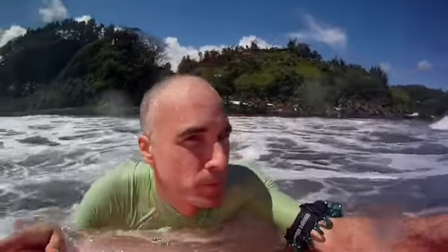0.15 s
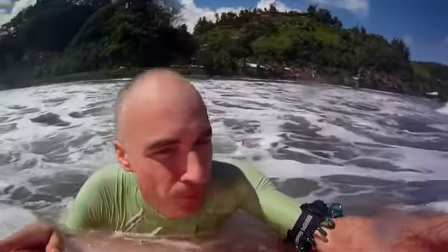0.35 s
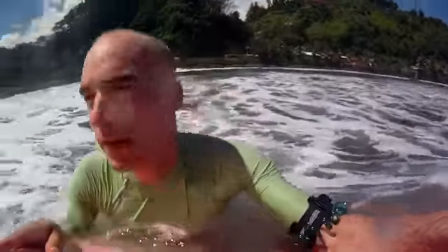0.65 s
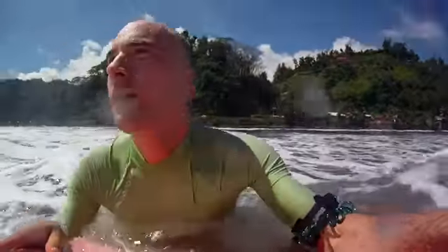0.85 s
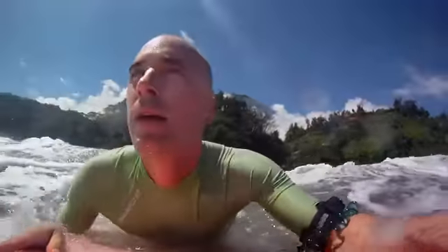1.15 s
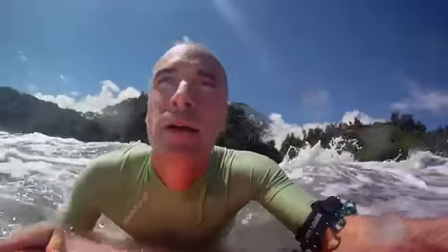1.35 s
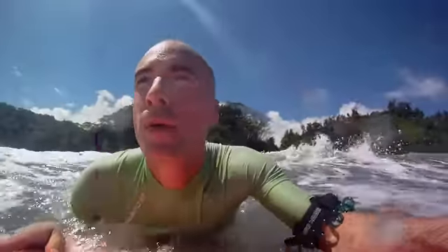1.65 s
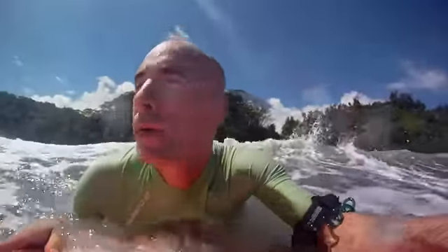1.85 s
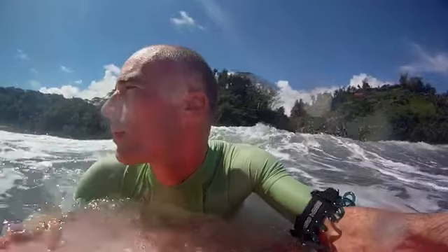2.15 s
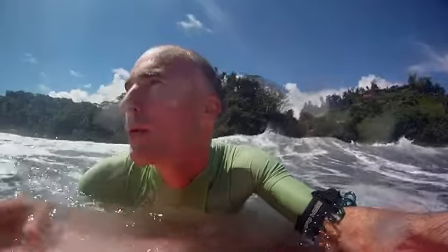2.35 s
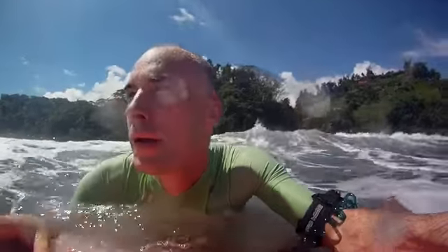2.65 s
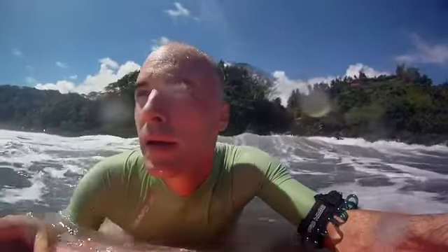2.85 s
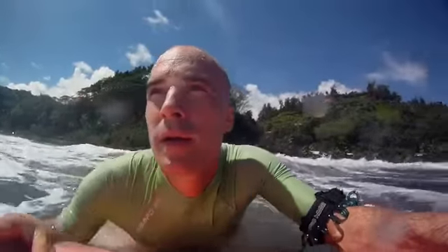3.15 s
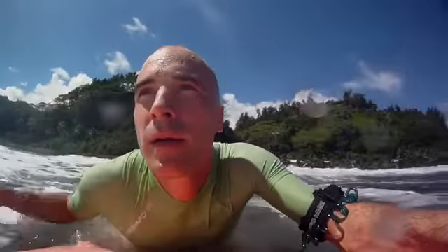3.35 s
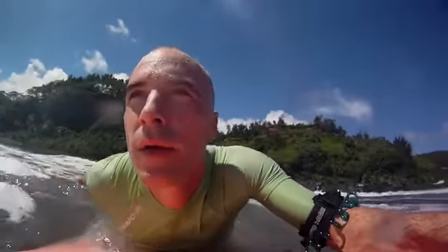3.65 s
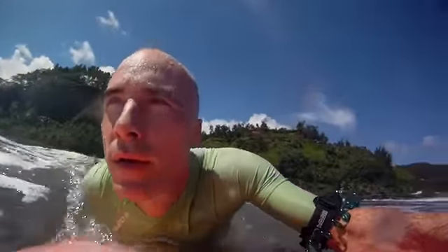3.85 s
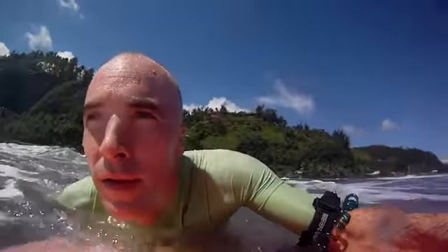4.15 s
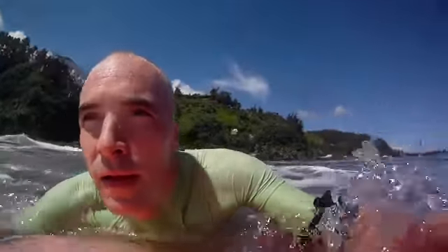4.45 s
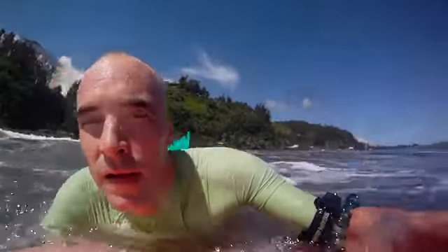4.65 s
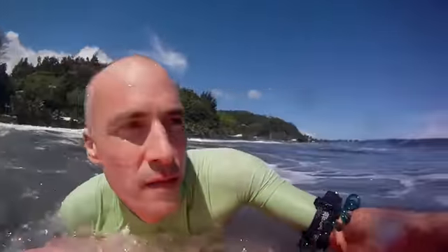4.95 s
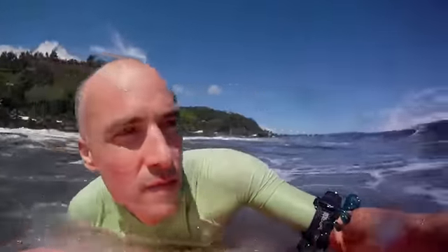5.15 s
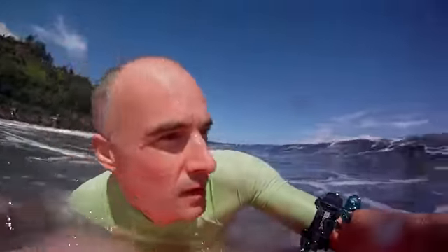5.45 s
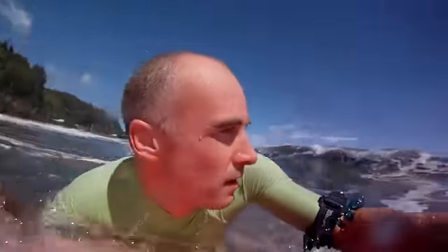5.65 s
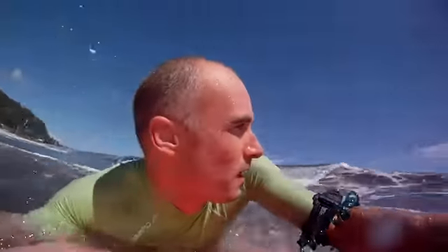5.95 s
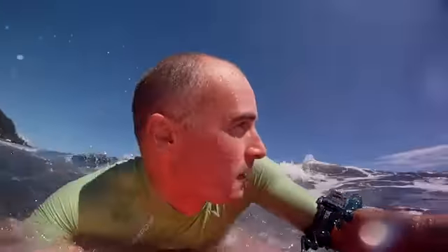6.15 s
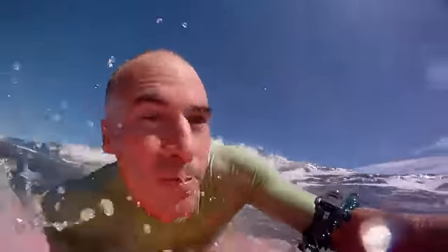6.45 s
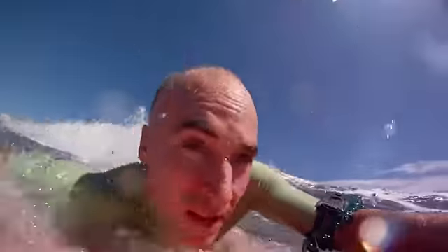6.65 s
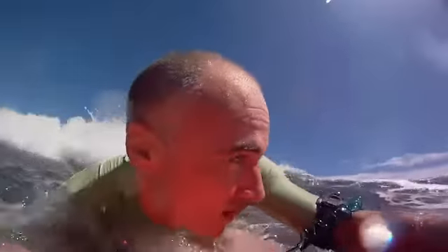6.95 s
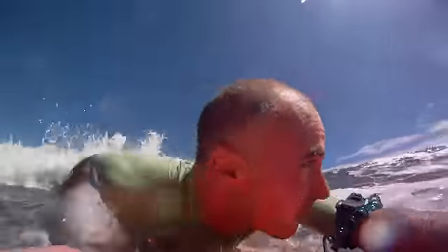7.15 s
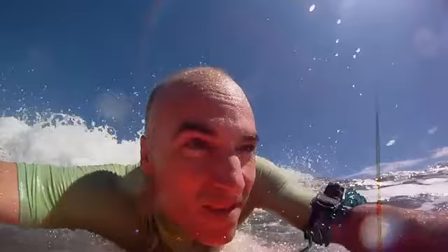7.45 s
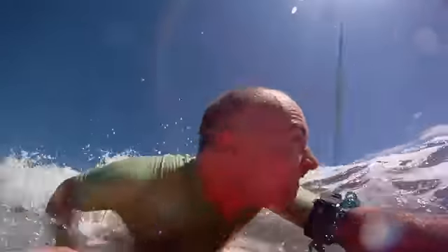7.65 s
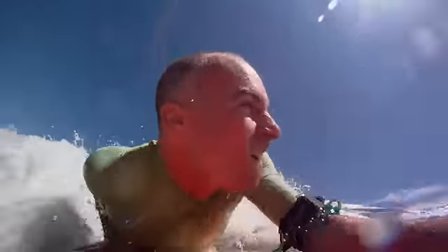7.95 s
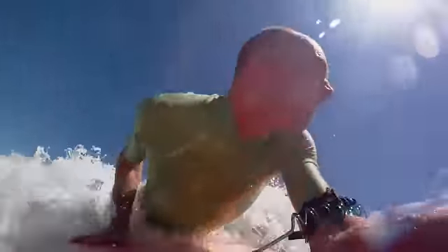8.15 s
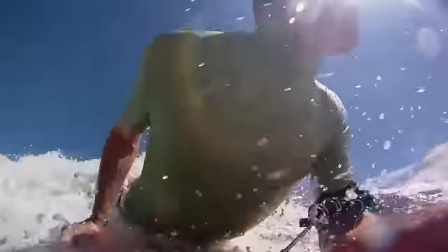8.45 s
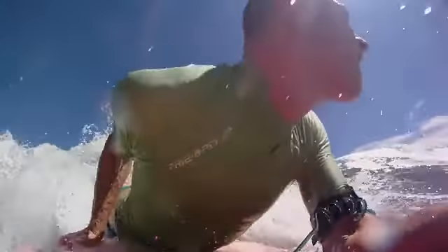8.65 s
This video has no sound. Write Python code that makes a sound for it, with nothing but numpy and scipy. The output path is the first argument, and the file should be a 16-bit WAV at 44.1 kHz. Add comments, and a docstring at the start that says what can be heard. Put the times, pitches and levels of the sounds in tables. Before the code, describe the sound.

Heard through a waterproof camera case on a surfboard, the sea begins as a faint, muffled wash broken by a cluster of sharp drop ticks. The sloshing grows, and surges gurgle, slap and rumble against the board under a thin hiss of foam. Late on, spray hits the case in two bright, pattering bursts, the loudest sounds, followed by a smaller spatter and more sloshing.

```python
"""Whitewater hisses, sloshes and gurgles round a surfboard, heard from a camera in a sealed housing on it.
Waves drive the board's lowest mode into a boom, water slaps the board, and squeezed air pockets sing.
Spray drops tick on the housing, whose air resonances colour both their impacts and the hiss of the foam.
One microphone feeds both channels; loud drops saturate it, and the right channel loses its deep bass."""
import sys
import numpy as np
from scipy import signal
from scipy.fft import rfft, irfft, next_fast_len
from scipy.io import wavfile
from scipy.ndimage import uniform_filter1d, map_coordinates

SR = 44100
rng = np.random.default_rng(int(sys.argv[2]) if len(sys.argv) > 2 else 0)


def to_wav(sig):
    """Store sig (one row per channel, or 1-D mono) as 16-bit WAV at the path in sys.argv[1].

    Samples outside -1..1 are clipped; the rate is SR.
    """
    pcm = np.clip(np.atleast_2d(sig), -1, 1) * 32767
    pcm = np.round(pcm).astype(np.int16)
    wavfile.write(sys.argv[1], SR, pcm.T)  # frames by channels


N = 387638

# Envelope of the foam. Each row: time in seconds, hiss level in dB.
FOAM_LEVELS = [(0, -61.5), (.3, -65.5), (.76, -58.5), (.82, -51.5), (.93, -49), (1.05, -53.5), (1.33, -54),
               (1.55, -45.5), (2.1, -49.5), (2.8, -43.5), (3.05, -48), (3.35, -41), (3.7, -45.5),
               (5.0, -45.5), (5.3, -42.5), (6.65, -47), (6.95, -30.5), (7.2, -44.5), (7.48, -37.5),
               (7.7, -44.5), (8.79, -45.5)]
# Envelope of the water working at the board. Each row: time in seconds, slosh level in dB.
SLOSH_LEVELS = [(0, -56.5), (.4, -66), (.5, -56), (1.07, -62), (1.49, -52.5), (2.3, -50.5), (2.67, -43),
                (3.05, -44.5), (3.4, -39), (3.75, -44.5), (4.36, -56), (4.5, -46.5), (5.0, -52),
                (5.33, -46), (6.07, -40.5), (6.28, -48.5), (6.45, -41.5), (6.63, -57), (6.93, -42),
                (7.17, -48), (7.42, -43), (8.0, -43), (8.79, -43.5)]
# Waves hitting the board. Each row: peak time in seconds, slosh, boom and heave in dB, fade in seconds.
WAVE_SURGES = [(0.61, -50, -61, -58, 0.12), (0.93, -50, -73, -66, 0.18), (1.43, -51, -41.5, -38.5, 0.092),
               (2.04, -47.5, -43.5, -47, 0.18), (2.8, -40, -37.5, -37, 0.18),
               (3.56, -28.5, -32, -30.5, 0.086), (3.9, -44, -33, -47, 0.11),
               (4.21, -41.5, -36.5, -35, 0.15), (4.65, -49, -41, -50, 0.15), (4.8, -41, -39, -48, 0.095),
               (5.208, -32, -33, -25.5, 0.066), (5.48, -39.5, -43.5, -40, 0.3),
               (6.42, -38.5, -31.5, -50, 0.076), (6.78, -38.5, -43, -43, 0.15),
               (7.55, -39.5, -53, -42, 0.16), (7.88, -40, -37, -36, 0.067), (8.41, -47, -35, -36, .12)]
# Big drops on the housing. Each row: start in seconds, level in dB, ring pitch in Hz, brightness in dB.
BIG_DROPS = [(1.023, -37, 4570, -30), (1.213, -31.5, 4250, -28), (1.277, -36.5, 4180, -35),
             (1.335, -37, 4200, -30), (1.484, -10.5, 2970, -22.5), (1.5007, -19, 3760, -33),
             (1.524, -20, 2480, -31), (1.529, -13, 3950, -30), (1.5335, -16, 4260, -35),
             (1.5367, 0, 2760, -39), (1.5556, -27, 3460, -9), (1.586, -12.5, 3030, -37),
             (1.6223, -22, 4640, -40), (2.845, -20, 4070, -29), (2.908, -23, 4550, -37),
             (3.5477, -18.5, 3130, -17.5), (3.901, -21.5, 3370, -28), (5.1889, -13, 3390, -16),
             (5.535, -25, 3300, -23), (5.655, -29, 3290, -10.5), (5.874, -8, 5330, -19),
             (5.892, -14, 5080, -26), (6.8057, -11, 4880, -16), (6.8563, -18.5, 2420, -36),
             (6.9367, -6.5, 3780, -14), (6.9551, -4, 4830, -20), (6.9604, -4.5, 3216, -21),
             (6.9768, -1.5, 3178, -27), (6.993, -5.5, 3650, -32), (7.0121, -2, 3650, -38),
             (7.0277, -14, 3790, -26), (7.0633, -15, 3720, -30), (7.11, -17, 3400, -20),
             (7.137, -11.5, 2830, -25), (7.201, -24.5, 3800, -12.5), (7.2478, -13.5, 3340, -24),
             (7.331, -20, 4000, -22), (7.3484, -12, 3240, -36), (7.3596, -10, 2490, -37),
             (7.387, -17, 4550, -28), (7.3958, -15.5, 2780, -20), (7.424, -11, 3666, -33),
             (7.471, -27, 3040, -8), (7.5173, -15, 3260, -15), (7.5305, -4, 4740, -21),
             (7.5359, -1, 3085, -34), (7.556, -6, 4810, -23), (7.842, -25, 2950, -28),
             (8.008, -12, 3260, -17), (8.0848, -26, 3340, -29), (8.217, -28, 3340, -8),
             (8.546, -24, 4770, -26)]
# Showers of spray. Each row: peak time in seconds, level in dB, build and fade in seconds,
# brightness in dB.
SPRAY_SHOWERS = [(6.8, -38, .1, 0.26, -15.5), (6.956, -16.5, 0.031, 0.14, -16),
                 (7.4, -35, 0.23, 0.21, -14.5), (7.55, -31, 0.21, 0.14, -19),
                 (8.01, -24, .003, 0.041, -8.5), (8.05, -40.5, .02, .33, -12)]
# Water striking the board. Each row: start in seconds, level in dB, pitch in Hz, 60 dB decay in seconds.
WATER_SLAPS = [(0.456, -42, 945, 0.082), (0.909, -33.5, 870, 0.047), (1.109, -40, 918, 0.12),
               (1.374, -35, 1258, 0.18), (1.436, -36.5, 954, 0.14), (1.53, -33, 1350, 0.1),
               (1.567, -31.5, 1780, 0.21), (1.725, -29.5, 1435, 0.037), (2.025, -30.5, 416, 0.061),
               (2.844, -25, 1085, 0.13), (3.308, -19.5, 852, 0.061), (4.649, -30, 1095, 0.11),
               (4.812, -23, 1570, 0.033), (5.113, -27.5, 980, 0.048), (5.174, -18, 299, 0.079),
               (5.41, -15.5, 1560, 0.04), (5.488, -16, 1355, 0.047), (5.851, -27.5, 504, 0.21),
               (6.354, -29, 1536, 0.13), (6.774, -27.5, 1794, 0.089), (6.991, -21.5, 1740, 0.046),
               (7.103, -23, 1194, 0.041), (7.33, -23.5, 1300, 0.036), (7.427, -25.5, 1250, 0.13),
               (7.548, -23, 1870, 0.025), (8.36, -31, 1238, 0.15)]
# Squeezed air pockets. Each row: start in seconds, level in dB, first and last pitch in Hz,
# length in seconds, roughness from 0 to 1.
AIR_POCKETS = [(2.516, -33.5, 642, 584, 0.039, 0.56), (2.874, -27.5, 940, 890, 0.056, 0.82),
               (3.172, -24.5, 1205, 1045, 0.039, 0.3), (3.184, -19.5, 953, 860, 0.052, 0.27),
               (3.354, -21.5, 852, 888, 0.033, 0.72), (3.436, -19.5, 510, 509, 0.027, 0.72),
               (3.488, -25, 880, 907, 0.038, 0.62), (3.523, -16.5, 776, 654, 0.034, 0.78)]
# Transmission through the board. Each row: frequency in Hz, gain in dB.
BOARD_RESPONSE = [(110, -11.5), (180, -11), (225, -9), (503, -7.5), (769, -9.5), (1110, -6.5), (1330, -10),
                  (1540, -6), (2600, -20), (3380, -70), (5720, -120)]
# Transmission of airborne sound into the housing. Each row: frequency in Hz, gain in dB.
HOUSING_RESPONSE = [(1180, 2.5), (2000, -3.5), (2680, -7), (3230, 3), (4000, -2), (4790, 1.5), (5000, 1),
                    (5590, -12), (6300, -21), (6990, -18), (8150, -24), (9350, -14.5), (10300, -27.5),
                    (12200, -19.5), (15500, -37)]
# Air modes of the housing. Each row: frequency in Hz, bandwidth in Hz, added gain in dB.
HOUSING_MODES = [(3190, 250, 4.5), (3790, 110, 3.5), (4780, 320, 3), (7160, 350, 7)]
# Spectrum of the slow heave. Each row: frequency in Hz, relative spectral density in dB.
HEAVE_SPECTRUM = [(8, -46), (18, 5), (32, 10.5), (70, -8.5), (120, -45.5)]

BOOM_HZ, BOOM_WIDTH_HZ, BOOM_FLUTTER_DB = 145.7, 61, 2  # the board's lowest mode
SLOSH_REFERENCE_DB = -47
BOOM_OFFSET_DB, HEAVE_OFFSET_DB = -1.5, -3.5  # relative to the slosh at its reference level
BOOM_SLOPE, HEAVE_SLOPE = 1.46, 1.03  # dB per dB of slosh
SURGE_BUILD_RATIO = 1.44  # build time over fade time
DROP_RISE_S, DROP_T60_S = 0.0011, 0.013
CEILING, TOP_HZ = 0.76, 15400
RIGHT_BASS_HZ, RIGHT_LAG_S = 110, 1.2e-6


def whitewater():
    """Superposition of foam, slosh, boom and heave; shared modulation makes foam and slosh move as one."""
    foam_gain = amp(envelope(FOAM_LEVELS))
    slosh_gain, boom_gain, heave_gain = wave_gains()
    fizz = grains(np.ones(N), count=6000, hz=4580, octaves=0.73, cycles=2.3, scatter_db=-0.5, size=64)
    churn = wobble(22)
    return (foam_gain * foam(fizz, churn) + slosh_gain * slosh(churn)
            + boom_gain * board_boom() + heave_gain * heave())


def wave_gains():
    """Incoherent sources add in power: surges ride on the running levels of slosh, boom and heave."""
    slosh_db = envelope(SLOSH_LEVELS)
    excess_db = slosh_db - SLOSH_REFERENCE_DB
    boom_db = SLOSH_REFERENCE_DB + BOOM_OFFSET_DB + BOOM_SLOPE * excess_db
    heave_db = SLOSH_REFERENCE_DB + HEAVE_OFFSET_DB + HEAVE_SLOPE * excess_db
    power = amp([slosh_db, boom_db, heave_db]) ** 2
    for s, *peaks_db, fade in WAVE_SURGES:
        power += amp(peaks_db)[:, None] ** 2 * swell(s, 0, SURGE_BUILD_RATIO * fade, fade) ** 2
    return np.sqrt(power)


def foam(fizz, churn):
    """Airborne noise of bursting bubbles passes through the housing; stray drops tick on the shell."""
    strays = grains(np.ones(N), count=110, hz=6540, octaves=0.97, cycles=7.4, scatter_db=2, size=96)
    airborne = patchy_noise(2.14, size=5) + 0.38 * unit(fizz)
    hiss = unit(amp(1.15 * churn) * housing(airborne))
    return hiss + 0.049 * unit(filtered(strays, lambda hz: hz > 1500))


def slosh(churn):
    """Structure-borne sound: the noise of churning water and its damped gurgles cross the board."""
    clumps = amp(4 * wobble(14))
    gurgle = grains(clumps, count=2500, hz=793, octaves=0.871, cycles=3, scatter_db=3, size=900)
    wash = board(amp(1.78 * churn) * patchy_noise(3.84, size=3))
    return unit(unit(wash) + 0.48 * unit(board(gurgle)))


def board_boom():
    """Forced resonance: a fluctuating random force drives the lowest mode of the board."""
    def response(hz):
        damping = 1j * hz * BOOM_WIDTH_HZ
        mode = damping / (BOOM_HZ ** 2 - hz ** 2 + damping)
        floor = 0.059 * (hz > 50) * (hz < 260)
        return (mode + floor) / (1 + (hz / 250) ** 4)

    force = amp(1.5 * wobble(30)) * rng.standard_normal(N)
    return unit(filtered(force, response) * amp(BOOM_FLUTTER_DB * wobble(11)))


def heave():
    """The slow heave of the water is band-limited noise near the lower limit of hearing."""
    return unit(filtered(rng.standard_normal(N), lambda hz: amp(log_interp(HEAVE_SPECTRUM, hz))))


def big_drops():
    """Impact excitation: each drop gives the housing a damped ring, a crack with splatter and a tick."""
    ring, crack, tick = np.zeros((3, N + SR))
    t = np.arange(SR // 10) / SR
    rise = 1 - np.exp(-(t / DROP_RISE_S) ** 2)
    decay_db = -60 * t / DROP_T60_S
    splatter = amp(-16.5 + 0.16 * decay_db)
    for s, db, hz, bright_db in BIG_DROPS:
        span = slice(round(s * SR), round(s * SR) + len(t))
        ring[span] += amp(db + decay_db) * rise * np.sin(2 * np.pi * hz * t)
        crack[span] += amp(db) * (amp(decay_db) + splatter) * rise * rng.standard_normal(len(t))
        tick_shape = amp(db + bright_db + 1.04 * decay_db) * t / (t + 0.00049)
        tick[span] += tick_shape * rng.standard_normal(len(t))
    tick_colour = [(6500, 5.5), (8300, -0.5), (9500, 1), (15000, -5.5)]  # Hz, dB
    treble = lambda hz: (hz > 5800) * amp(log_interp(tick_colour, hz))
    middle = lambda hz: np.exp(-(hz / 7000) ** 4) * (1 - np.exp(-(hz / 1500) ** 4))
    body = 1.35 * ring[:N] + 1.86 * housing(crack[:N])
    return filtered(body, middle) + 3.08 * filtered(tick[:N], treble)


def spray():
    """Shot noise: small drops strike the housing at random, in clumps, and merge into a patter."""
    body_gain = power_sum(swell(s, db, build, fade) for s, db, build, fade, _ in SPRAY_SHOWERS)
    fine_gain = power_sum(swell(s, db + bright_db, build, fade)
                          for s, db, build, fade, bright_db in SPRAY_SHOWERS)
    active = body_gain > amp(-55)
    active_s = active.sum() / SR
    clumps = active * amp(8.8 * wobble(120))
    patter = grains(clumps, int(1400 * active_s), hz=3870, octaves=0.75, cycles=3.8,
                    scatter_db=1.5, size=96)
    inside = housing(patter)
    through_board = filtered(patter, lambda hz: amp(log_interp(BOARD_RESPONSE, hz)) * (hz > 1200))
    body = inside + 0.24 * through_board
    ticks = grains(active, int(160 * active_s), hz=9700, octaves=0.36, cycles=8.4,
                   scatter_db=4, size=160)
    fine = filtered(6 * unit(inside) + unit(ticks), lambda hz: hz > 5800)
    gated_unit = lambda x: x * active / np.sqrt(np.mean(x[active] ** 2))
    return body_gain * gated_unit(body) + fine_gain * gated_unit(fine)


def slaps():
    """Impulsive loading: water hits the board in a decaying noise burst, strongest round one pitch."""
    tone, push = np.zeros((2, N + SR))
    t = np.arange(SR // 4) / SR
    for s, db, hz, t60 in WATER_SLAPS:
        shape = amp(db - 60 * t / t60) * t / (t + 0.00055)
        drift = 0.13 * np.cumsum(rng.standard_normal(len(t)))  # phase noise widens the pitch to a band
        span = slice(round(s * SR), round(s * SR) + len(t))
        tone[span] += shape * np.sin(2 * np.pi * hz * t + drift)
        push[span] += shape * rng.standard_normal(len(t))
    return 0.89 * filtered(tone[:N], lambda hz: hz < 3000) + 5 * board(push[:N]) + 0.41 * housing(push[:N])


def air_pockets():
    """Cavity resonance: squeezed air glides with its octave until water closes it; rough ones sputter."""
    tone, sputter = np.zeros((2, N))
    for s, db, start_hz, end_hz, length, rough in AIR_POCKETS:
        progress = np.linspace(0, 1, round(length * SR))
        pitch = end_hz + (start_hz - end_hz) * (1 - progress) ** 3
        drift = rough * 0.134 * np.cumsum(rng.standard_normal(len(progress)))
        phase = 2 * np.pi * np.cumsum(pitch) / SR + drift
        partials = np.sin(phase) + (0.22 + 0.5 * rough) * np.cos(2 * phase)
        shape = amp(db) * np.sin(np.pi * progress ** 1.03) ** 0.49
        span = slice(round(s * SR), round(s * SR) + len(progress))
        tone[span] += shape * (1 - 0.65 * rough) * partials
        sputter[span] += shape * rough * rng.standard_normal(len(progress))
    return filtered(tone, lambda hz: hz < 3000) + 4.6 * board(sputter) + 0.46 * housing(sputter)


def board(x):
    """Transmission through the board acts as a low-pass filter."""
    return minimum_phase(x, lambda hz: amp(log_interp(BOARD_RESPONSE, hz)))


def housing(x):
    """Sound insulation: the sealed housing shuts out low airborne sound and resonates at its air modes."""
    def gain(hz):
        modes_db = sum(db / (1 + (2 * (hz - centre) / width) ** 2) for centre, width, db in HOUSING_MODES)
        high_pass = hz ** 2 / (hz ** 2 + 1300 ** 2)
        return amp(log_interp(HOUSING_RESPONSE, hz) + modes_db) * high_pass

    return minimum_phase(x, gain)


def grains(density, count, hz, octaves, cycles, scatter_db, size):
    """A random point process of damped sines, each size samples long, likelier where density is high."""
    starts = np.searchsorted(np.cumsum(density), rng.random(count) * np.sum(density))
    pitch = np.clip(hz * 2 ** (octaves * rng.standard_normal((count, 1))), 50, SR * 0.4)
    turns = pitch * np.arange(size) / SR
    strength = amp(scatter_db * np.minimum(rng.exponential(size=(count, 1)), 3.5))
    rings = strength * np.sin(2 * np.pi * turns * (1 + 0.016 * turns)) * np.exp(-turns / cycles)
    return np.bincount((starts[:, None] + np.arange(size)).ravel(), rings.ravel(), N + size)[:N]


def patchy_noise(depth_db, size):
    """White noise modulated by random patches of gain in time and frequency."""
    spectra = signal.stft(rng.standard_normal(N), nperseg=256)[2]
    field = uniform_filter1d(rng.standard_normal(spectra.shape), size=size, axis=0)
    field = uniform_filter1d(field, size=size, axis=1)
    return signal.istft(spectra * amp(depth_db * unit(field)), nperseg=256)[1][:N]


def minimum_phase(x, gain, size=4096):
    """Causal filtering by a gain curve: folding the cepstrum lets nothing ring before a hit."""
    cepstrum = irfft(np.log(gain(np.fft.rfftfreq(size, 1 / SR)) + 1e-6))
    cepstrum[1:size // 2] *= 2
    cepstrum[size // 2 + 1:] = 0
    return signal.oaconvolve(x, irfft(np.exp(rfft(cepstrum))))[:N]


def filtered(x, response):
    """Linear filtering: the spectrum is multiplied by a complex frequency response."""
    size = next_fast_len(N + 8192)
    return irfft(rfft(x, size) * response(np.fft.rfftfreq(size, 1 / SR)), size)[..., :N]


def swell(s, db, build, fade):
    """Exponential growth and decay about a peak at time s: 20 dB up in build, 20 dB down in fade."""
    t = np.arange(N) / SR - s
    return amp(db - 20 * np.where(t < 0, -t / build, t / fade))


def wobble(rate):
    """Slow random modulation: a spline through rate knots a second."""
    knots = rng.standard_normal(int(N * rate / SR) + 4)
    return map_coordinates(knots, [np.arange(N) * rate / SR])


def envelope(points):
    """Linear interpolation of (seconds, value) points at every sample."""
    return np.interp(np.arange(N) / SR, *np.transpose(points))


def log_interp(points, hz):
    """Interpolation of (Hz, value) points on a logarithmic frequency axis."""
    frequencies, values = np.transpose(points)
    return np.interp(np.log(hz + 1), np.log(frequencies + 1), values)


def power_sum(gains):
    """Incoherent addition of amplitudes."""
    return np.sqrt(sum(gain ** 2 for gain in gains))


def amp(db):
    """Amplitude ratio of a level in dB."""
    return 10 ** (np.asarray(db) / 20)


def unit(x):
    """Normalisation to an RMS of one."""
    return x / np.sqrt(np.mean(x ** 2) + 1e-20)


def scene():
    """Superposition at a single point: both channels carry the same sum of sources."""
    water = whitewater() + spray() + big_drops() + slaps() + air_pockets()
    return np.array([water, water])


def record(dry):
    """Self-noise and saturation: the microphone hisses and flattens peaks; the right input loses bass."""
    microphone_hiss = amp(-71.5) * unit(filtered(rng.standard_normal(N), lambda hz: hz > 5500))
    heard = dry[0] + microphone_hiss
    left = heard / (1 + np.abs(heard / CEILING) ** 6) ** (1 / 6)
    bass_cut = lambda hz: 1j * hz / (RIGHT_BASS_HZ + 1j * hz)
    right = filtered(left, lambda hz: bass_cut(hz) * np.exp(-2j * np.pi * hz * RIGHT_LAG_S))
    input_hiss = amp(-85.5) * filtered(rng.standard_normal((2, N)), lambda hz: (hz / 9000) ** 2)
    return filtered(np.array([left, right]) + input_hiss, lambda hz: hz < TOP_HZ)


dry = scene()
out = record(dry)
to_wav(out)
```